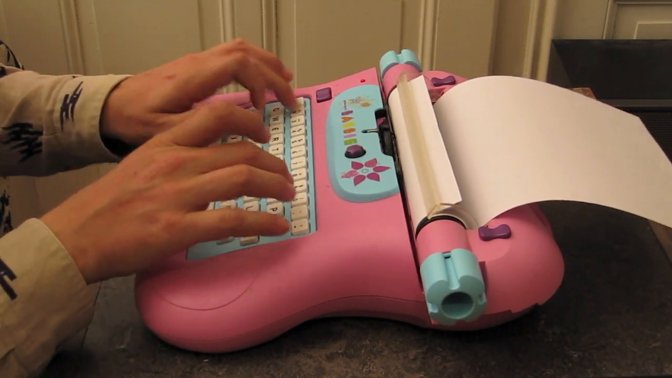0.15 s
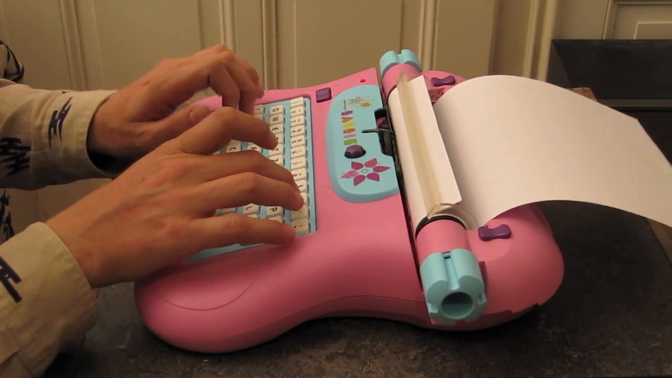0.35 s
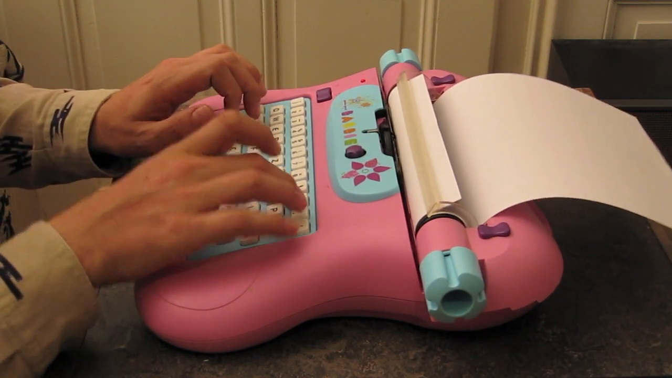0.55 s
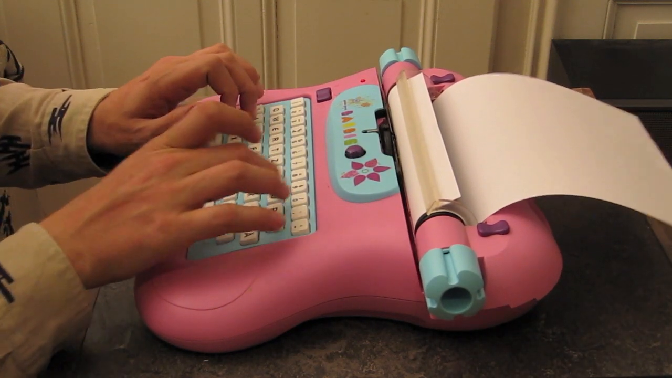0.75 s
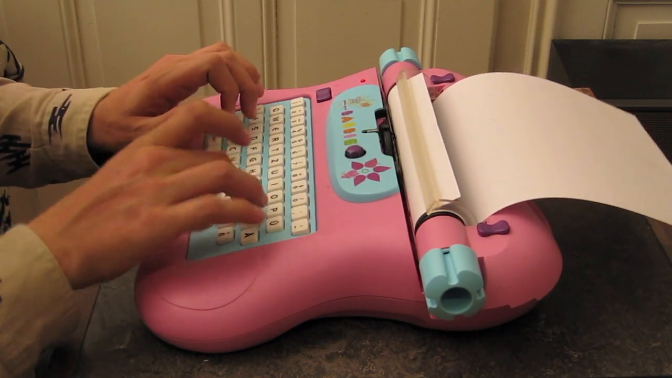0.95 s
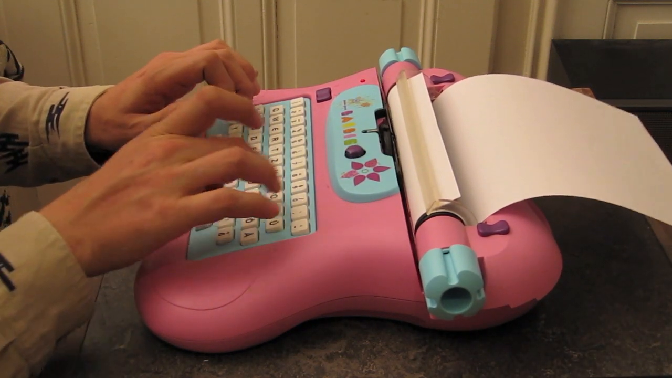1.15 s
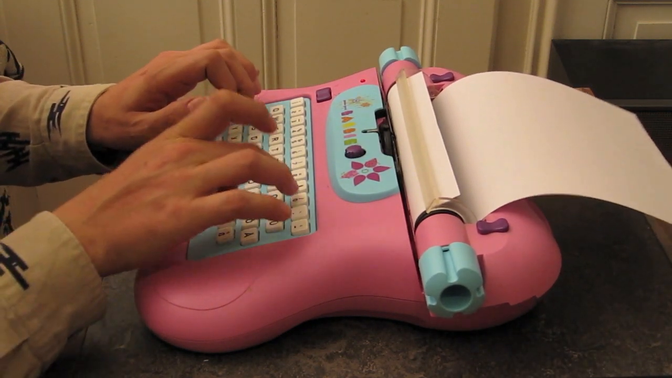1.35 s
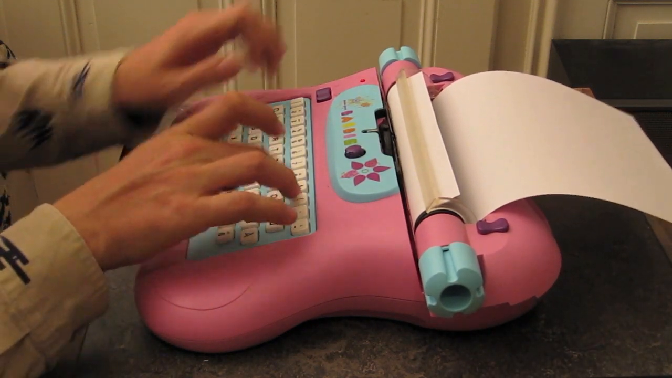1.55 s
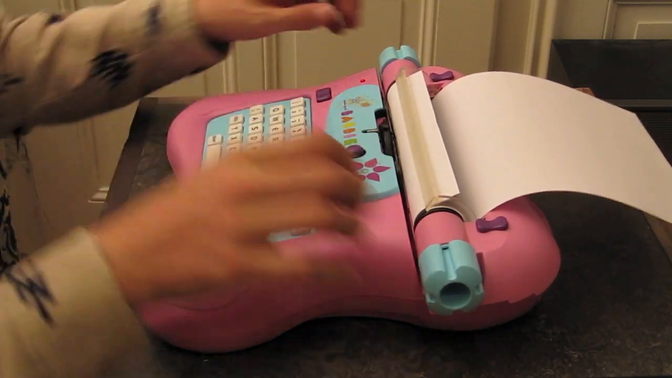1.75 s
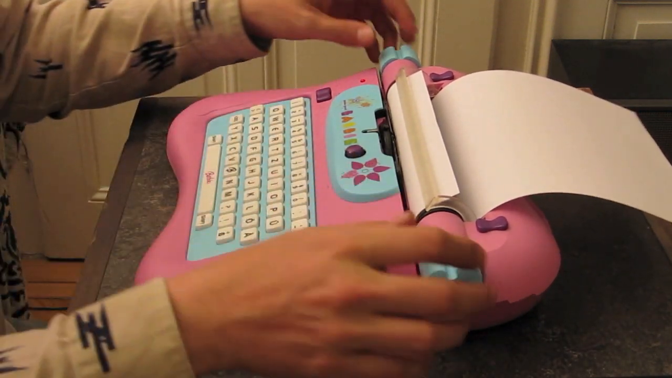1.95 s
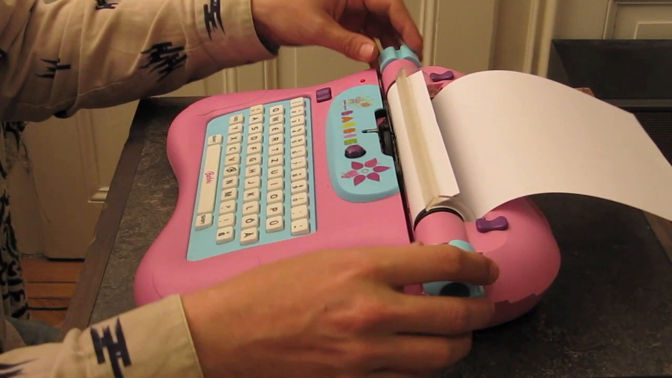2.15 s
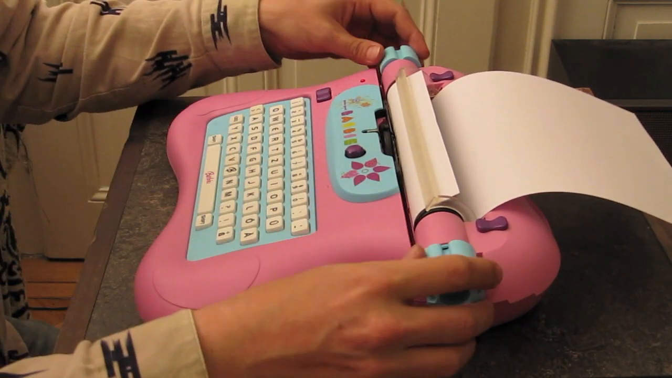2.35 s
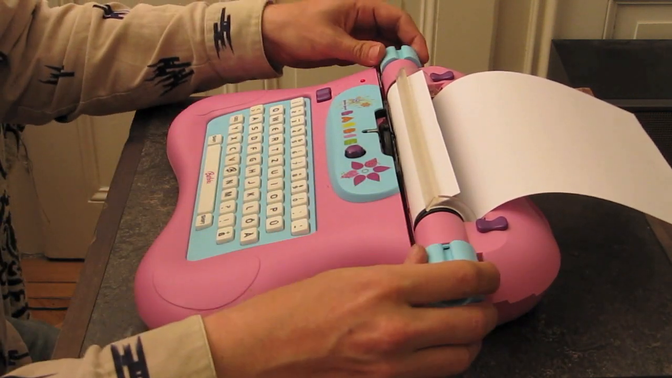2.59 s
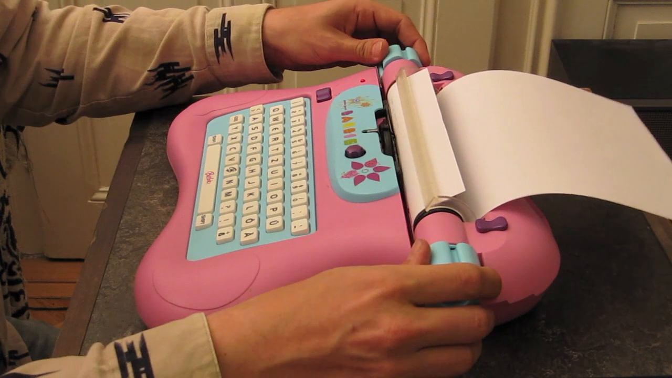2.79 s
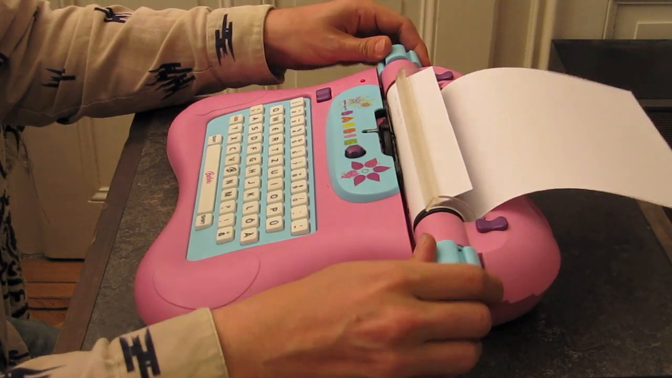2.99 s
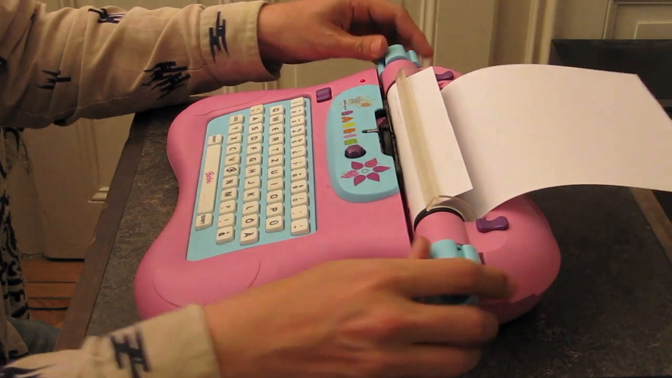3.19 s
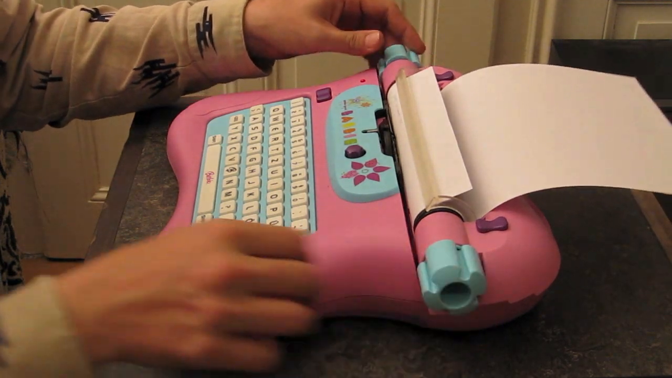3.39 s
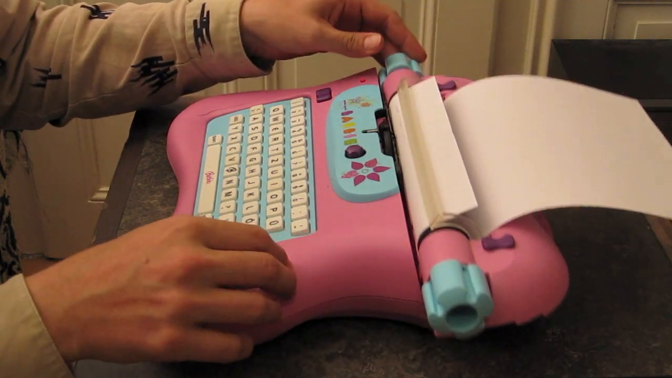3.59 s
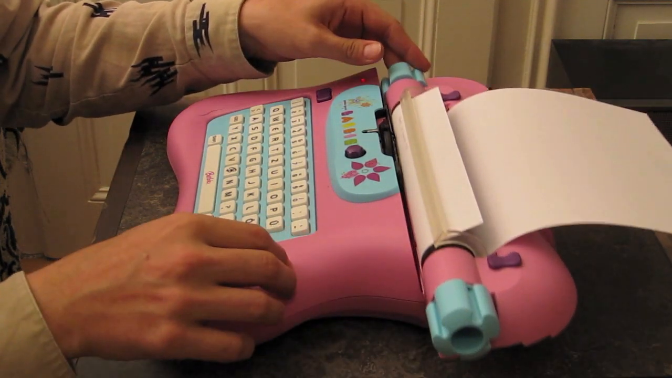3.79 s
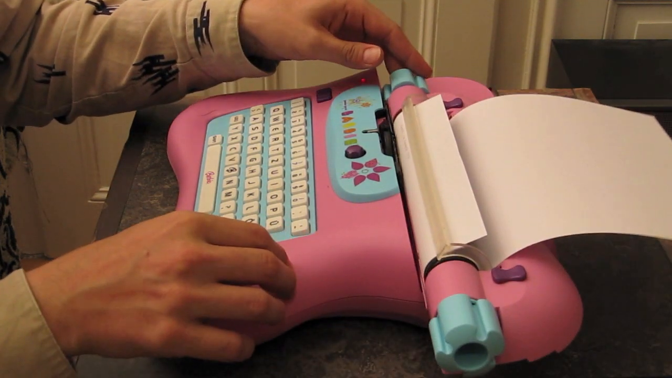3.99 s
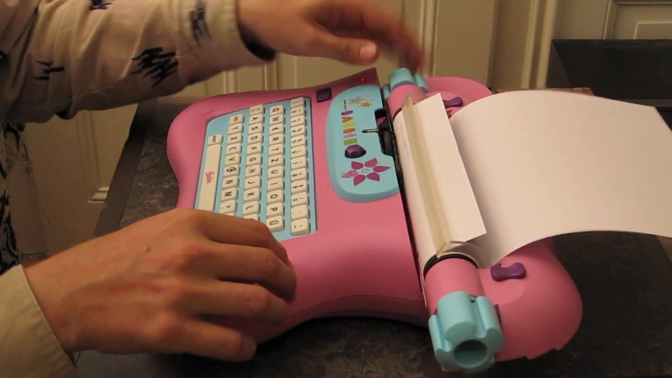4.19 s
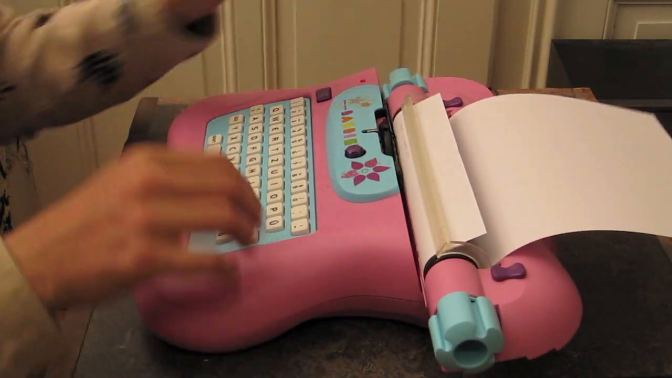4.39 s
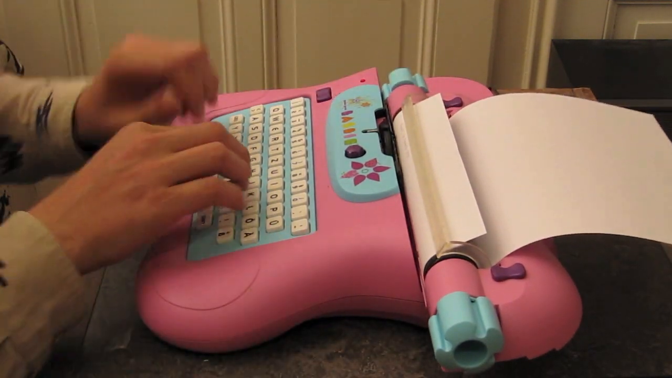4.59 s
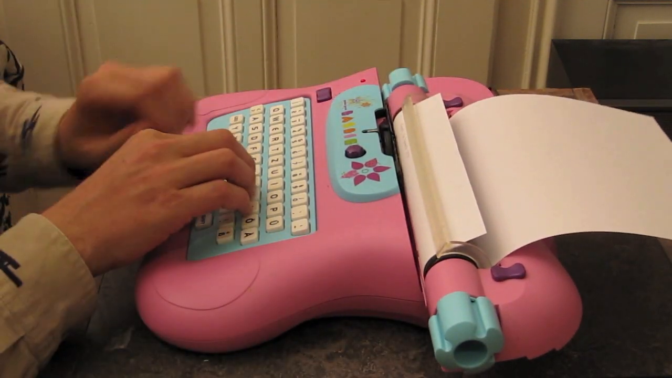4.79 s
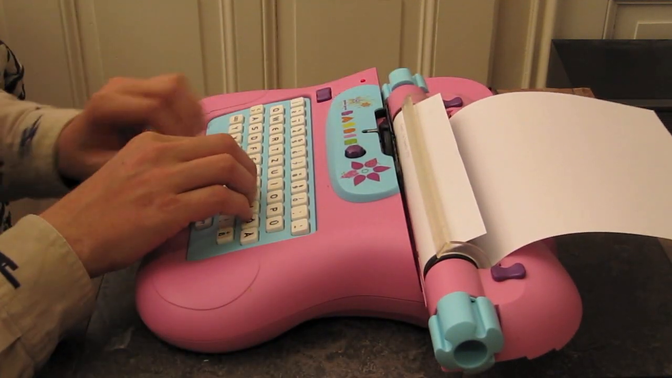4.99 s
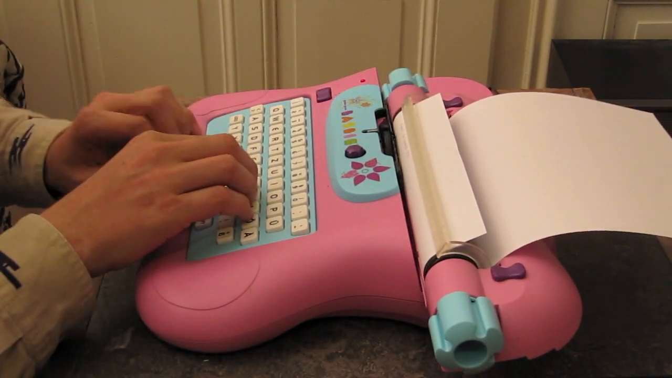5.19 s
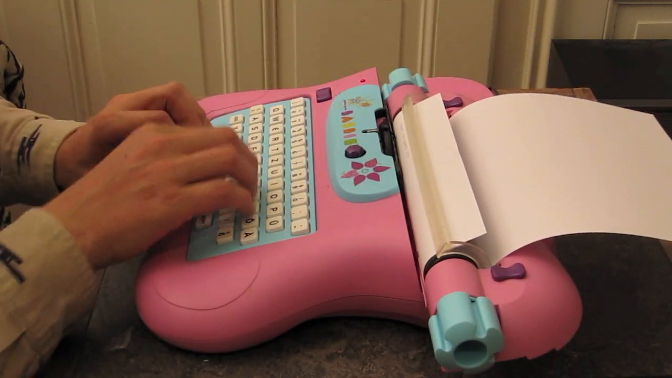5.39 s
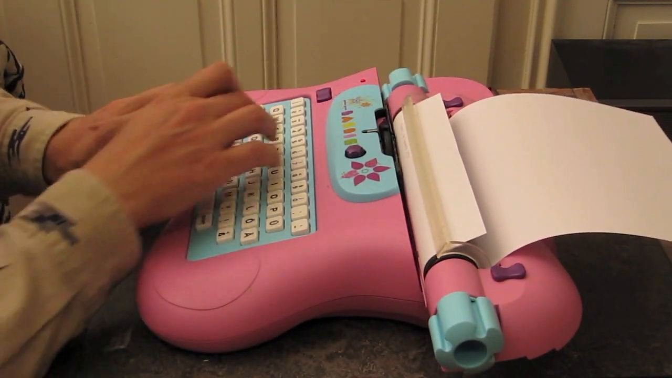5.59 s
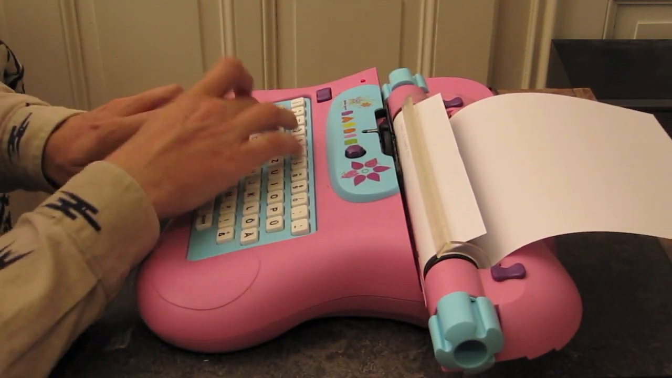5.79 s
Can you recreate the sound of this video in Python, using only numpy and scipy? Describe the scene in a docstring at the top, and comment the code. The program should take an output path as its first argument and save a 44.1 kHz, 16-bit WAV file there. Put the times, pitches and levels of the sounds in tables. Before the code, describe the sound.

A hollow plastic toy typewriter is heard close up in mono, in a small room with a short ring, quiet hiss and a thin high whine. A small stepper motor starts at 0.1 s, rattling and humming at a steady low-mid pitch, until a sharp hammer clack at 0.4 s, with a duller fall-back and tiny bounce just after. A very short whir gives a second clack at 0.66; longer whirs from 1.0 and 1.48 end in clacks at 1.26 and 1.74. After near-silence, the roller knob snaps brightly at 2.7 and 2.95, each with quick rebounds. A faint brush and touch precede a dense, bright ratchet clatter from 3.52 to 3.98, about fifty teeth per second, sagging around 3.8. The released carriage gives a light double knock at 4.23. Hands brush back around 4.4-4.8 with a faint high squeak, then barely audible soft taps until 5.8 as the hiss rises slightly.

```python
"""Toy typewriter printing four letters

On a table in a small room, a stepper motor spins the rattling type wheel, humming on the longer turns, and a
hammer snaps against it and falls back. The roller knob clicks twice, the carriage is pushed over its ratchet
and let go, and hands brush back with a faint squeak and settle softly on the keys, over hiss and a thin whine.
Knocks are short bursts of coloured noise, most with ringing modes; the room answers with fading noise."""
import sys
import numpy as np
from scipy import signal
from scipy.fft import rfft, irfft, next_fast_len
from scipy.io import wavfile
from scipy.ndimage import uniform_filter1d, map_coordinates

SR = 44100
rng = np.random.default_rng(int(sys.argv[2]) if len(sys.argv) > 2 else 0)


def output_pcm(signal):
    """Save a mono or channel-first signal as 16-bit PCM at the path in sys.argv[1].

    Samples are clipped to [-1, 1] before scaling.
    """
    pcm = np.clip(np.atleast_2d(signal).T, -1, 1) * 32767
    wavfile.write(sys.argv[1], SR, np.round(pcm).astype(np.int16))


N = 257544  # length of the scene in samples

STEP_HZ = 353.5  # motor steps per second at full speed
# The wheel speeds up, brakes, and starts braking this long before the hammer launches.
SPIN_UP_S, BRAKE_S, BRAKE_LEAD_S = .039, .034, .0425
START_DB, BRAKE_DB = -39, -36.5  # rattle at half speed on the way up, and as braking begins
# The printed letters. Each row: wheel start in seconds, hammer launch in seconds, blow in dB,
# fall-back in dB, rattle of the running wheel in dB, motor hum in dB.
LETTERS = [(.1093, 0.3941, -7.5, -21, -50, -40), (.586, 0.652, -9, -20, -47, -45),
           (1.0012, 1.2498, -8.5, -17.5, -57, -43.5), (1.482, 1.7266, -8.5, -20, -52.5, -39.5)]
# Colour of the wheel's rattle. Each row: frequency in Hz, relative level in dB per Hz.
WHEEL_COLOUR = [(88, -54.5), (150, -19.5), (321, -3), (484, -18.5), (745, -6), (888, -4.5), (1260, 0.5),
                (2060, -9), (2450, -2.5), (2870, -11), (3420, -7.5), (6140, -15), (10400, -6.5),
                (13200, -19), (16000, -45)]
# Resonances that lift the rattle. Each row: frequency in Hz, width in Hz, lift in dB.
WHEEL_MODES = [(784, 30, 8.5), (1270, 110, 0), (2590, 67, 2)]


def wheel_rattle(ramp_depth=0.34, run_depth=0.44, slow_hz=130, swell_db=4):
    """Each motor step shakes the loose type wheel, hardest while it speeds up and brakes."""
    t, shake = np.arange(N) / SR, np.zeros(N)
    for start, launch, _, _, run_db, _ in LETTERS:
        brake = launch - BRAKE_LEAD_S
        reached = min((brake - start) / SPIN_UP_S, 1)  # a short turn never gets to full speed
        speeding_up = (t - start) / SPIN_UP_S
        braking = reached - (t - brake) / BRAKE_S
        speed = np.clip(np.minimum(speeding_up, braking), 0, 1)
        steps = np.cumsum(slow_hz + (STEP_HZ - slow_hz) * speed) / SR
        start_level = amp(START_DB + swell_db * (speed - .5))
        brake_level = amp(BRAKE_DB + swell_db * (speed - reached))
        stages = [speed == 0, t > brake, speed < 1]
        level = np.select(stages, [0, brake_level, start_level], amp(run_db))
        ramp_pulse = 1 + ramp_depth * np.cos(2 * np.pi * steps)
        run_pulse = 1 + run_depth * np.cos(np.pi * steps)  # every second step knocks harder
        shake += level * np.where(speed < 1, ramp_pulse, run_pulse)

    def resonance(f):
        return amp(sum(db / (1 + (2 * (f - hz) / width) ** 2) for hz, width, db in WHEEL_MODES))

    rattle = unit(filtered(noise(WHEEL_COLOUR, N), resonance))
    return in_room(shake * rattle, wet_db=-5)[:N]


HUM_SWELL_S, HUM_FADE_DB_PER_S = 0.048, 170.5  # the hum builds up in the case and rings out
# The first four multiples of the step rate. Each entry: relative level in dB.
HARMONICS = [0, -22.5, -19, -24]


def motor_hum(onset_s=.026, waver_db=2):
    """The stepper sings at its full step rate, swelling until it brakes; a very short turn has no hum."""
    t, hum = np.arange(N) / SR, np.zeros(N)
    for start, launch, *_, db in LETTERS:
        brake = launch - BRAKE_LEAD_S
        driven = np.maximum(np.minimum(t, brake) - start - onset_s, 0)  # stays 0 if it brakes before the onset
        fade_db = HUM_FADE_DB_PER_S * np.maximum(t - brake, 0)
        hum += (1 - np.exp(-driven / HUM_SWELL_S)) * amp(db - fade_db)
    tone = np.zeros(N)
    for k, db in enumerate(HARMONICS, 1):
        # a smooth random curve; higher harmonics waver more, the first not at all
        waver = map_coordinates(rng.standard_normal(N // 2000 + 4), [np.arange(N) / 2000])
        wave = np.sin(2 * np.pi * (k * STEP_HZ * t + rng.random()))
        tone += amp(db + waver_db * np.log(k) * waver) * wave
    return hum * unit(tone)


LAUNCH_DB = -11.5  # hammer launch, relative to the blow
# Colour of the hammer's launch. Each row: frequency in Hz, relative level in dB per Hz.
LAUNCH_COLOUR = [(180, -42.5), (300, -15), (842, -15.5), (1390, -3.5), (2840, -8), (3760, 0), (5340, -12),
                 (6410, -6), (7200, -21.5), (7950, -6), (10900, -5), (16000, -38)]
# Colour of the strike. Each row: frequency in Hz, relative level in dB per Hz.
STRIKE_COLOUR = [(88, -51.5), (150, -29.5), (303, -16), (1190, -23.5), (1630, -7.5), (2450, -13),
                 (2810, -0.5), (3100, -17.5), (3490, 3.5), (4760, -12), (5790, -4), (7040, -13.5),
                 (10800, -11.5), (16000, -39.5)]
# Colour of the fall-back. Each row: frequency in Hz, relative level in dB per Hz.
FALL_COLOUR = [(71, -55.5), (120, -27.5), (236, -12.5), (385, -6.5), (483, -22), (698, -8), (1030, -10.5),
               (1550, 0.5), (1830, -4), (2640, -4), (4500, -6.5), (4980, -9.5), (9590, -6), (12300, -14.5),
               (16000, -46)]
# Ringing of the print head. Each row: frequency in Hz, width in Hz, relative level in dB.
HEAD_MODES = [(664, 42, -13.5), (1390, 99, -6.5), (1600, 67, 0.5), (1760, 74, -4.5), (2310, 76, -5),
              (2730, 100, 2.5), (3485, 140, 2), (4340, 83, -1), (5160, 110, -6.5), (6100, 150, -5.5),
              (9100, 160, -11.5), (9750, 220, -10)]
# Ringing of the hollow plastic case on the table, also used by the roller, carriage and touches.
# Each row: frequency in Hz, width in Hz, relative level in dB.
CASE_MODES = [(84, 5.8, -16), (180, 45, -11.5), (207, 9.8, -5.5), (257, 15, 1), (341, 14, -2.5),
              (410, 35, -6.5)]


def hammer(flight_s=.0098, return_s=.0372, bounce_s=.0042, settle_s=.034):
    """The hammer kicks off, drives a letter into the roller, then falls back, bounces and settles."""
    out = np.zeros(N)
    for _, s, strike_db, fall_db, _, _ in LETTERS:
        kick = click(LAUNCH_COLOUR, attack=0.0004, t60=0.027, shiver_db=-15, shiver_t60=0.054)
        # it meets the letter's spoke just before the roller
        spoke = click(LAUNCH_COLOUR, attack=0.00031, t60=0.028, shiver_db=-21.5, shiver_t60=.04)
        add(kick, flight_s * .8, amp(1.0) * spoke)
        add(out, s, amp(strike_db + LAUNCH_DB) * in_room(kick, wet_db=-6.5))

        blow = click(STRIKE_COLOUR, attack=0.00051, t60=0.0081, shiver_db=-17, shiver_t60=0.052)
        blow += amp(-6) * ring(HEAD_MODES) + amp(-32.0) * ring(CASE_MODES)
        add(blow, 0, amp(-7.5) * crack())
        add(out, s + flight_s, amp(strike_db) * in_room(blow, wet_db=-10.5))

        for delay, db in [(0, 0), (bounce_s, 0), (settle_s, -12)]:
            knock = click(FALL_COLOUR, attack=0.0006, t60=.03, shiver_db=-11, shiver_t60=0.09)
            knock += amp(-9.5) * ring(HEAD_MODES) + amp(-25.5) * ring(CASE_MODES)
            add(out, s + return_s + delay, amp(fall_db + db) * in_room(knock, wet_db=-6))
    return out


REBOUND_SHRINK, REBOUND_DB = .68, -6.5  # second flight over the first; both rebounds relative to the snap
# Clicks of the knob. Each row: time in seconds, level in dB, delay of the first rebound in seconds.
DETENTS = [(2.7032, -11.5, .009), (2.9546, -12, .0105)]
# Colour of a detent snap. Each row: frequency in Hz, relative level in dB per Hz.
DETENT_COLOUR = [(100, -54), (240, -53), (480, -31), (850, -22.5), (1500, -12), (2400, -11), (3000, -5),
                 (3920, -0.5), (4500, -5.5), (5050, -1), (6000, -11), (6900, -7), (10000, -5.5),
                 (12800, -15), (16000, -33)]
# Ringing of the roller and knob. Each row: frequency in Hz, width in Hz, relative level in dB.
ROLLER_MODES = [(1060, 37, -22), (1482, 85, -13), (2040, 63, -3), (2930, 110, -4), (3730, 160, -22),
                (3950, 120, 0), (5040, 150, -1), (6550, 120, 20), (9800, 340, -12.5), (12000, 240, -3)]


def roller():
    """The knob's spring detent snaps into a notch and rebounds twice."""
    out = np.zeros(N)
    for s, db, flight in DETENTS:
        second = flight * (1 + REBOUND_SHRINK)
        for delay, loss_db in [(0, 0), (flight, REBOUND_DB), (second, REBOUND_DB)]:
            snap = click(DETENT_COLOUR, attack=0.00022, t60=0.015, shiver_db=-19.5, shiver_t60=0.1)
            snap += amp(-9.5) * ring(ROLLER_MODES) + amp(-37.0) * ring(CASE_MODES)
            add(snap, 0, amp(-4) * crack())
            add(out, s + delay, amp(db + loss_db) * in_room(snap, wet_db=-7.5))
    return out


# Colour of a ratchet tooth. Each row: frequency in Hz, relative level in dB per Hz.
RATCHET_COLOUR = [(88, -68.5), (150, -31), (201, -52), (484, -21.5), (805, -12.5), (1190, -13),
                  (1530, -7.5), (2020, -11.5), (2400, -5.5), (3490, 1), (5150, -5.5), (6640, -1.5),
                  (10400, -1.5), (13700, -17.5), (16000, -35.5)]
# Ringing of the pawl, the catch that drops over the teeth.
# Each row: frequency in Hz, width in Hz, relative level in dB.
PAWL_MODES = [(1510, 48, -34), (2420, 71, 2), (2860, 46, 2), (3320, 80, -8.5), (3600, 140, -11),
              (4600, 100, -8), (6410, 55, 9.5), (6950, 220, -20), (8800, 63, 6), (8600, 87, -8),
              (10100, 54, 4.5), (10900, 65, -13)]


def carriage(rebound_s=0.005, rebound_db=-10):
    """The pawl drops over one ratchet tooth after another and chatters after each."""
    out = np.zeros(N)
    for s, db in teeth():
        tooth = click(RATCHET_COLOUR, attack=0.00079, t60=0.015, shiver_db=-22.5, shiver_t60=0.05)
        tooth += amp(-10.5) * ring(PAWL_MODES) + amp(-42.5) * ring(CASE_MODES)
        chatter = click(RATCHET_COLOUR, attack=0.00044, t60=0.021, shiver_db=-15.5, shiver_t60=0.062)
        add(tooth, rebound_s * rng.uniform(0.74, 1.3), amp(rebound_db) * chatter)
        add(out, s, amp(db) * in_room(tooth, wet_db=-6.0))
    return out


TOOTH_DB, BRISK_TEETH_PER_S, DB_PER_DOUBLING = -13, 49, 2.04  # a tooth at a brisk pace; faster is louder
GRIP_DB, GRIP_S = -2.5, .07  # the hand bears down gradually, so the first teeth are softer
# Speed of the carriage, which drags halfway through the push.
# Each row: time in seconds, speed in teeth per second.
PUSH = [(3.5194, 38.0), (3.5382, 51.6), (3.6418, 61.4), (3.7336, 55.0), (3.7482, 30.3), (3.8297, 23.9),
        (3.8772, 47.5), (3.9477, 50.3), (3.98, 19.1)]


def teeth():
    """Time and level of each ratchet tooth, from the carriage's travel and speed."""
    knots, rates = np.transpose(PUSH)
    t = np.arange(knots[0], knots[-1], 1 / SR)
    travel = np.cumsum(np.interp(t, knots, rates)) / SR  # in teeth
    s = np.interp(np.arange(np.ceil(travel[-1])), travel, t)
    speed_db = DB_PER_DOUBLING * np.log2(np.interp(s, knots, rates) / BRISK_TEETH_PER_S)
    grip_db = GRIP_DB * np.exp(-(s - s[0]) / GRIP_S)
    return zip(s, TOOTH_DB + speed_db + grip_db)


# The released carriage knocks in its slack, then rocks back, weaker and duller.
LET_GO_S, LET_GO_DB, LET_GO_HZ, LET_GO_THUD_DB = 4.2322, -32, 2700, -43.5
ROCK_BACK_S, ROCK_BACK_DB, ROCK_BACK_DULLING = 0.014, -5, 0.49  # dulling multiplies the centre frequency
# Fingers touching keys and carriage.
# Each row: time in seconds, tap in dB, centre of the tap in Hz, thud of the case in dB.
TOUCHES = [(0.967, -48, 2310, -46), (3.4959, -44.5, 1600, -56), (4.798, -55.5, 2300, -74),
           (4.908, -69, 604, -56), (5.018, -52, 2245, -72), (5.417, -47.5, 1295, -56),
           (5.477, -48, 990, -53), (5.536, -48, 3990, -64), (5.622, -55, 400, -51),
           (5.787, -54.5, 700, -59.5)]
# Hands and sleeves brushing the toy.
# Each row: middle in seconds, length in seconds, level in dB, centre in Hz.
BRUSHES = [(3.401, 0.34, -68.5, 2000), (4.559, 0.42, -65, 6000), (4.71, .2, -65, 2370),
           (5.622, .6, -68.5, 450)]


def hands():
    """Fingers touch the toy, brush over it, and let go of the carriage, which rocks once."""
    out = np.zeros(N)
    for s, db, hz, thud_db in TOUCHES:
        add(out, s, touch(db, hz, thud_db))
    add(out, LET_GO_S, touch(LET_GO_DB, LET_GO_HZ, LET_GO_THUD_DB))
    rock_back = touch(LET_GO_DB, LET_GO_HZ * ROCK_BACK_DULLING, LET_GO_THUD_DB)
    add(out, LET_GO_S + ROCK_BACK_S, amp(ROCK_BACK_DB) * rock_back)
    for s, length, db, hz in BRUSHES:
        stroke = arch(length)
        rustle = noise(soft_colour(hz, skirt_db=-18, edge_db=-34), len(stroke))
        add(out, s - length / 2, amp(db) * stroke ** 2 * rustle)
    return out


def touch(db, hz, thud_db):
    """A soft tap of noise centred on hz, and a thud of the hollow case."""
    tap = amp(db) * click(soft_colour(hz), attack=0.0021, t60=0.036, shiver_db=-12.5, shiver_t60=0.2)
    return in_room(tap + amp(thud_db) * ring(CASE_MODES), wet_db=-8.5)


def soft_colour(hz, body_db=-9, skirt_db=-17, edge_db=-30):
    """The broad spectrum of a soft contact centred on hz."""
    low = [(hz / 16, edge_db), (hz / 3, body_db), (hz, 0)]
    high = [(hz * 1.13, -4), (hz * 4.9, skirt_db), (hz * 6, edge_db), (hz * 20, -60)]
    return low + high


SQUEAK_S, SQUEAK_LENGTH_S, SQUEAK_DB = 4.565, 0.33, -59.5  # middle, length and level, as the hands move back
SQUEAK_HZ, SQUEAK_RISE_HZ = 5560, 570  # its pitch at the ends, and the rise in the middle


def squeak(jitter_hz=110, octave_db=-19, flutter_db=3):
    """A thin unsteady squeak that is highest and loudest in the middle of its stroke."""
    out, stroke = np.zeros(N), arch(SQUEAK_LENGTH_S)
    jitter = unit(uniform_filter1d(rng.standard_normal(len(stroke)), size=90))
    flutter = unit(uniform_filter1d(rng.standard_normal(len(stroke)), size=500))
    pitch = SQUEAK_HZ + SQUEAK_RISE_HZ * stroke + jitter_hz * jitter
    phase = 2 * np.pi * np.cumsum(pitch) / SR
    tone = np.sin(phase) + amp(octave_db) * np.sin(2 * phase)
    tone = unit(tone * amp(flutter_db * flutter))
    sound = in_room(amp(SQUEAK_DB) * stroke ** 3 * tone, wet_db=-3)
    add(out, SQUEAK_S - SQUEAK_LENGTH_S / 2, sound)
    return out


# Colour of the room tone. Each row: frequency in Hz, relative level in dB per Hz.
AIR_COLOUR = [(15, -34.5), (25, -4.5), (108, -4.5), (205, -7.5), (275, -5.5), (610, -14), (755, -11.5),
              (959, -15.5), (1100, -14.5), (1920, -16.5), (2500, -16.5), (4260, -21), (7650, -20.5),
              (8290, -19.5), (14500, -28.5)]
# Loudness of the room tone. Each row: time in seconds, level in dB.
AIR_LEVEL = [(0, -67.5), (2.5, -68), (4.4, -65.5), (5.84, -63.5)]


def room_tone(whine_hz=7881, whine_db=-76, hiss_top_hz=14000):
    """Quiet air and hiss with a thin electrical whine."""
    t = np.arange(N) / SR
    air = filtered(noise(AIR_COLOUR, N), lambda hz: 1 / (1 + (hz / hiss_top_hz) ** 20))
    air_level = amp(np.interp(t, *np.transpose(AIR_LEVEL)))
    drift = np.cumsum(rng.standard_normal(N)) * 0.0097  # the whine's phase wanders
    whine = np.sin(2 * np.pi * whine_hz * t + drift)
    return air_level * air + amp(whine_db) * whine


# How long the room rings. Each row: frequency in Hz, seconds to fade by 60 dB.
ROOM_FADE = [(150, 0.33), (400, .5), (1040, 0.47), (2760, 0.5), (7280, 0.39), (11500, .34), (15000, 0.099)]
# Colour of the reflections. Each row: frequency in Hz, relative level in dB.
WALLS = [(150, 3), (480, 3.5), (720, 5), (1100, 0), (2000, 0), (3500, -2.5), (5500, -2), (11500, -5),
         (15000, 0.5)]


def in_room(x, wet_db):
    """A sound followed by the room's answer, each frequency dying at its own speed."""
    hz, t, z = signal.stft(rng.standard_normal(SR * 3 // 5), SR, nperseg=256)
    fade_db = along(WALLS, hz)[:, None] - 60 * t / along(ROOM_FADE, hz)[:, None]
    tail = signal.istft(z * amp(fade_db), SR, nperseg=256)[1]
    tail = tail * (1 - np.exp(-np.arange(len(tail)) / SR / 0.0013))  # reflections take a moment to build
    response = amp(wet_db) * tail / np.linalg.norm(tail)
    response[0] = 1  # the direct sound
    return signal.fftconvolve(x, response)


def click(spectrum, attack, t60, shiver_db, shiver_t60):
    """A plastic contact: a short crack, then the weaker shiver of many close modes (times in seconds)."""
    t = np.arange(SR // 5) / SR
    fade = amp(-60 * t / t60) + amp(shiver_db - 60 * t / shiver_t60)
    return noise(spectrum, len(t)) * fade * (1 - np.exp(-t / attack))


def ring(modes):
    """Damped modes, struck at slightly new strengths each time; wider modes die sooner."""
    t = np.arange(SR // 5) / SR
    hz, width, db = np.transpose(modes)[:, :, None]
    sizes = amp(db + rng.normal(0, 1.5, db.shape)) / np.linalg.norm(amp(db))
    waves = np.exp(-np.pi * width * t) * np.sin(2 * np.pi * (hz * t + rng.random(hz.shape)))
    return np.sum(sizes * waves, 0) * (1 - np.exp(-t / .0004))


# Colour of the first instant of a hard contact. Each row: frequency in Hz, relative level in dB per Hz.
EDGE_COLOUR = [(300, -41.5), (2500, -11.5), (6000, 2.5), (12500, -2.5), (16000, -15.5)]


def crack(t60=0.0037):
    """The bright, very brief edge of a hard blow."""
    t = np.arange(SR // 50) / SR
    return noise(EDGE_COLOUR, len(t)) * amp(-60 * t / t60) * (1 - np.exp(-t / 0.00018))


def arch(length):
    """A stroke that rises and falls again, 0 to 1 to 0, over a length in seconds."""
    return np.sin(np.linspace(0, np.pi, round(length * SR)))


def amp(db):
    """Decibels to gain."""
    return 10 ** (np.asarray(db) / 20)


def unit(x):
    """Scale to rms 1."""
    return x / np.sqrt(np.mean(x ** 2) + 1e-20)


def along(points, hz):
    """Read (Hz, value) points on a log axis."""
    f, v = np.transpose(points)
    return np.interp(np.log(hz + 1), np.log(f + 1), v)


def filtered(x, response):
    """Shape x by a gain that depends on frequency."""
    m = next_fast_len(len(x) + 8192)
    return irfft(rfft(x, m) * response(np.fft.rfftfreq(m, 1 / SR)), m)[:len(x)]


def noise(spectrum, size):
    """Coloured noise of rms 1."""
    return unit(filtered(rng.standard_normal(size), lambda hz: amp(along(spectrum, hz))))


def add(track, s, sound):
    """Mix a sound into the track at s seconds."""
    part = track[round(s * SR):][:len(sound)]
    part += sound[:len(part)]


def scene(bass_hz=110):
    """The toy and the room tone in one channel; the small case radiates little bass."""
    toy = wheel_rattle() + motor_hum() + hammer() + roller() + carriage() + hands() + squeak()
    toy = signal.sosfilt(signal.butter(2, bass_hz, "highpass", fs=SR, output="sos"), toy)
    return (toy + room_tone())[None]


def record(dry, top_hz=16300):
    """Nothing is kept above the band limit."""
    return np.array([filtered(x, lambda hz: hz < top_hz) for x in dry])


dry = scene()
out = record(dry)
output_pcm(out)
```